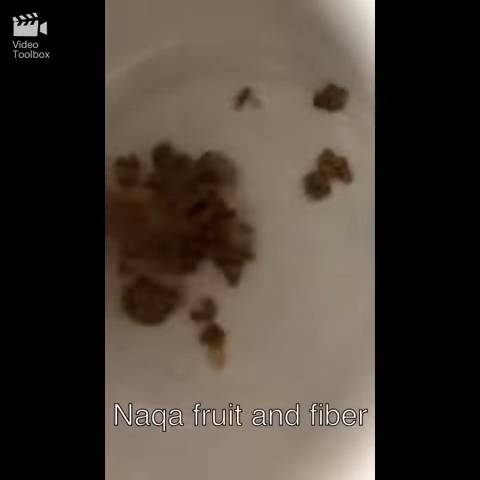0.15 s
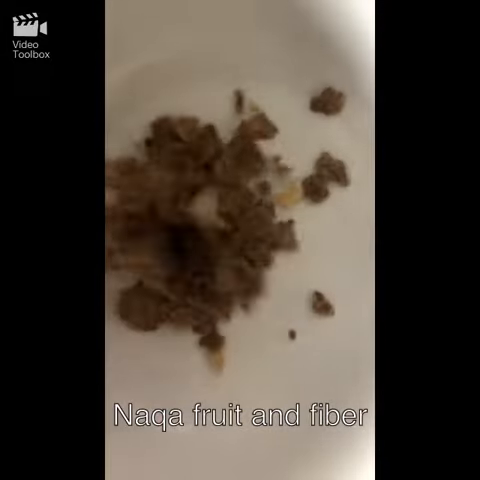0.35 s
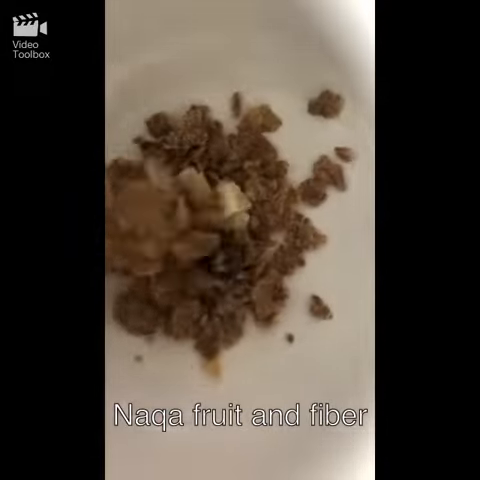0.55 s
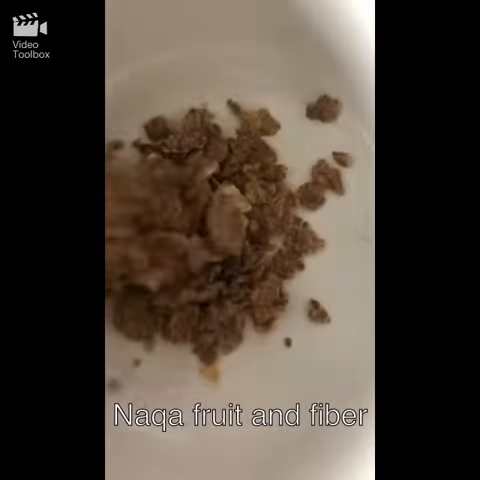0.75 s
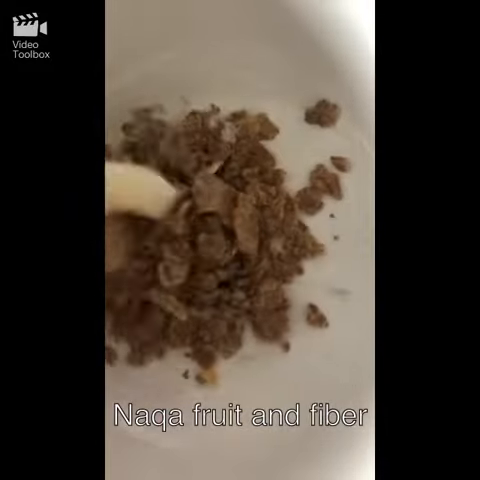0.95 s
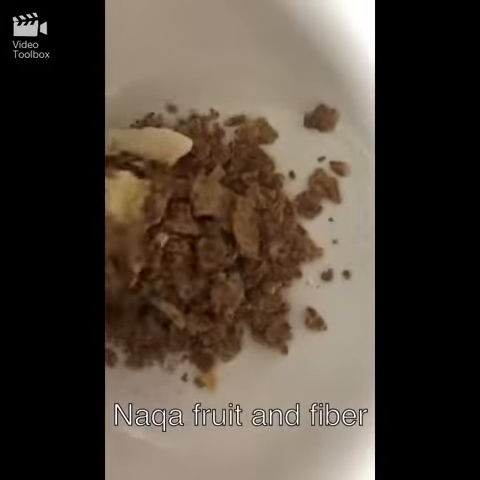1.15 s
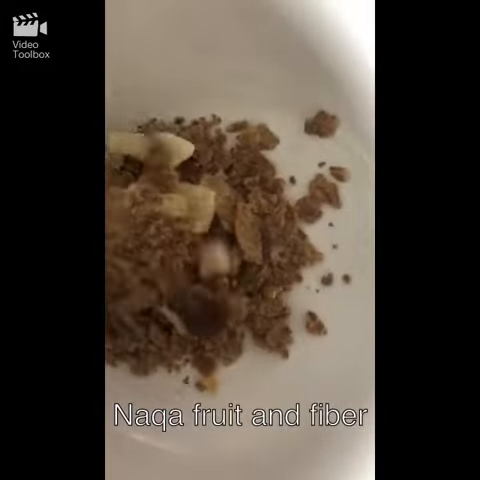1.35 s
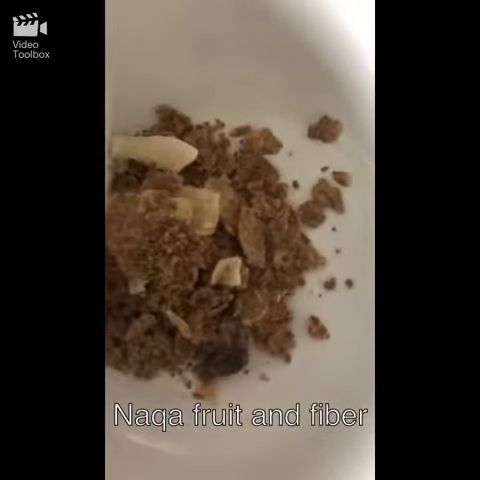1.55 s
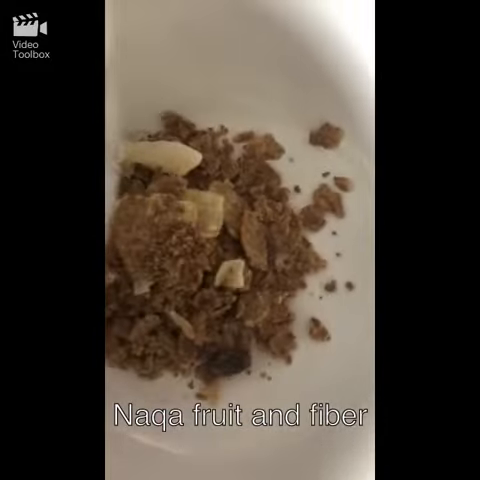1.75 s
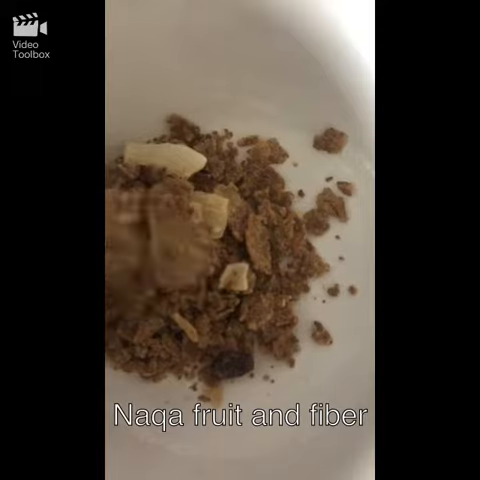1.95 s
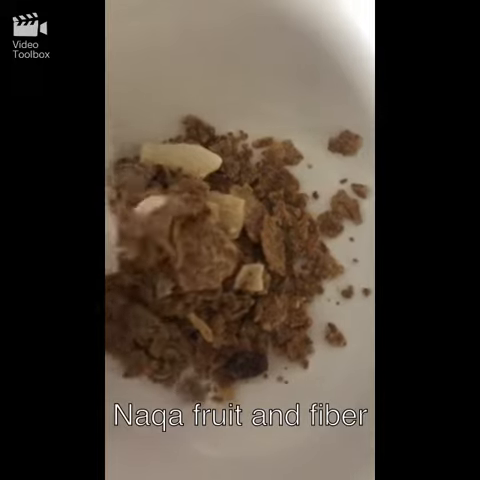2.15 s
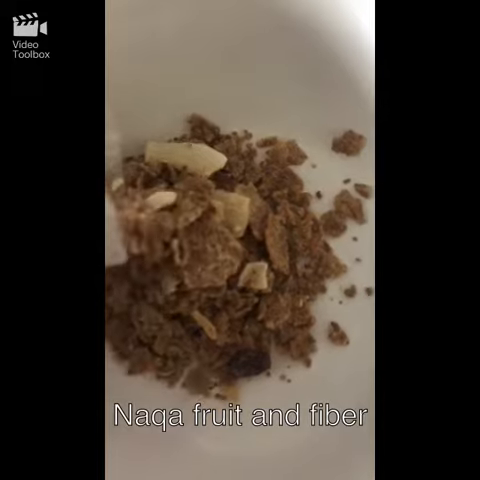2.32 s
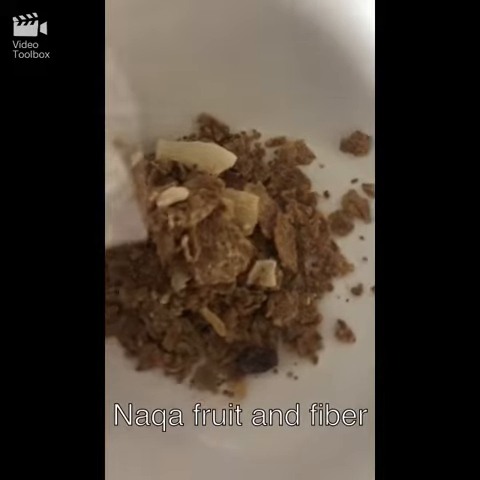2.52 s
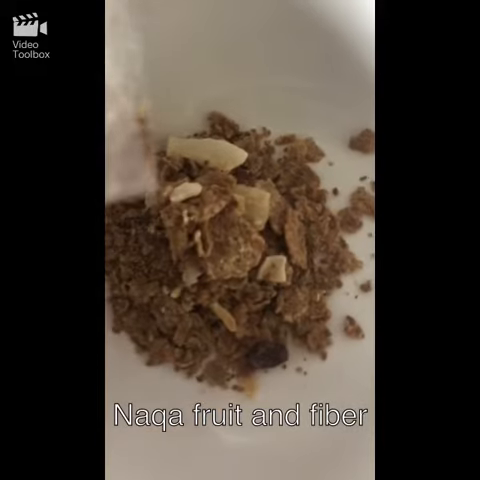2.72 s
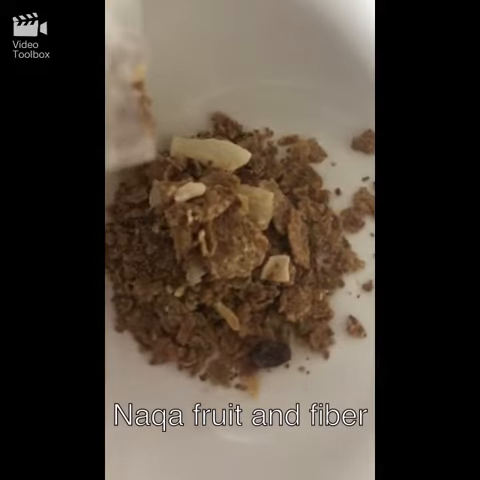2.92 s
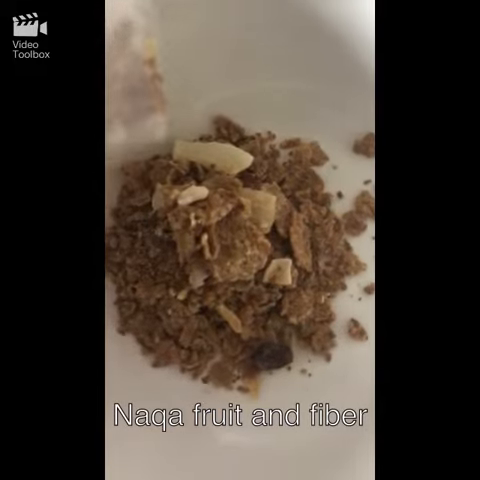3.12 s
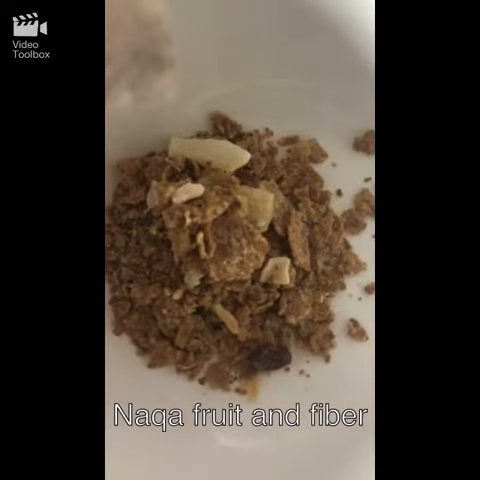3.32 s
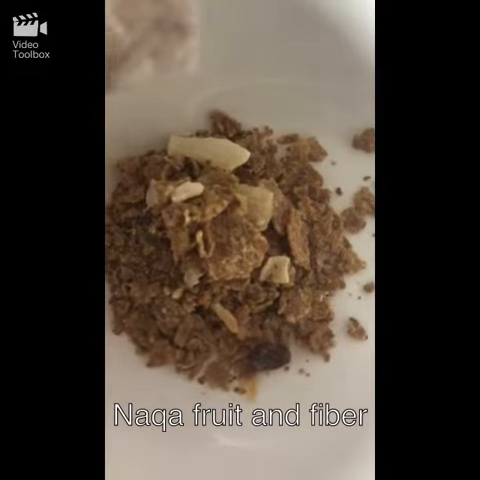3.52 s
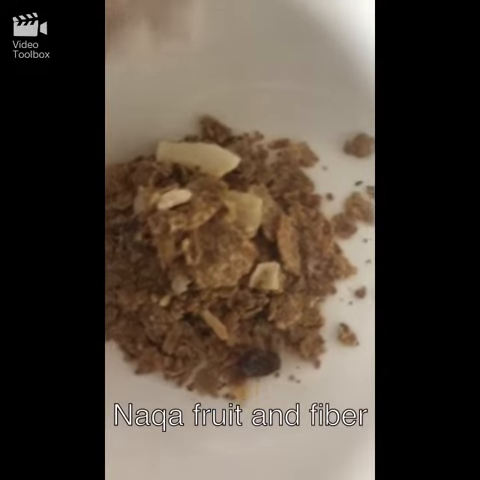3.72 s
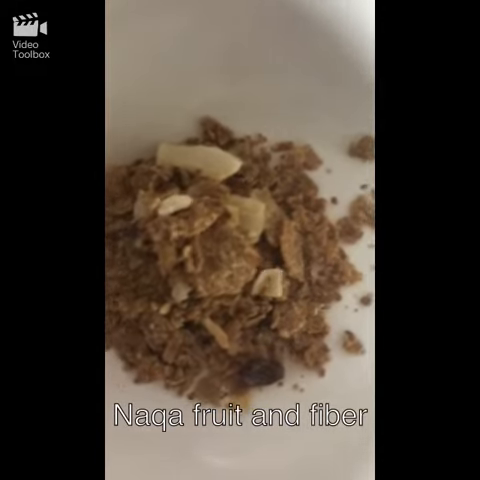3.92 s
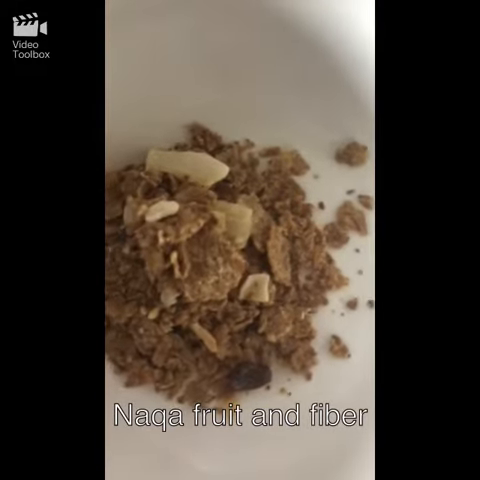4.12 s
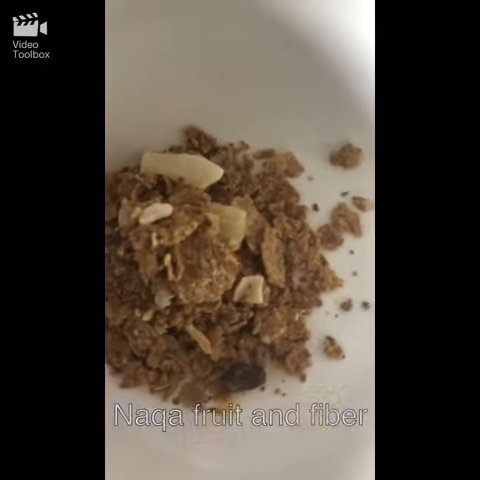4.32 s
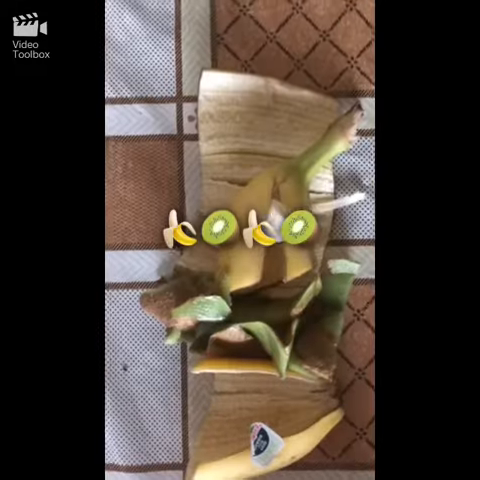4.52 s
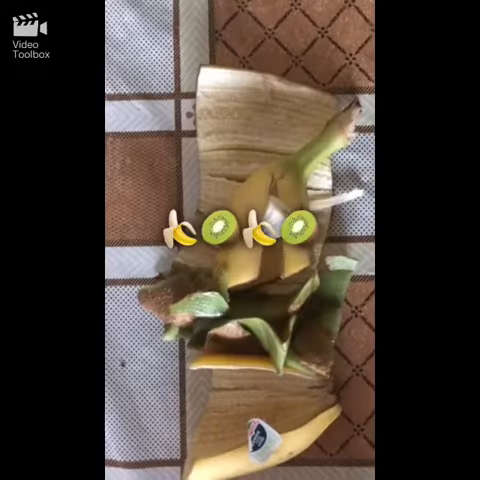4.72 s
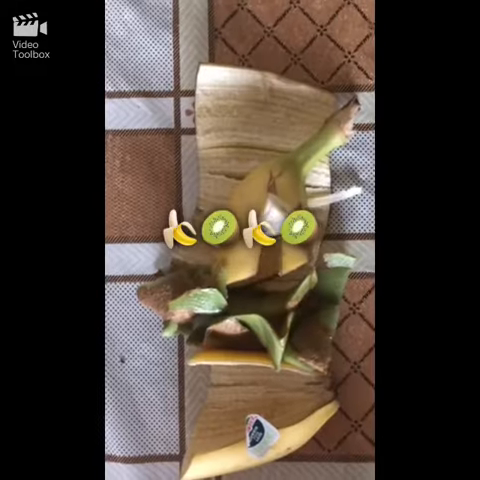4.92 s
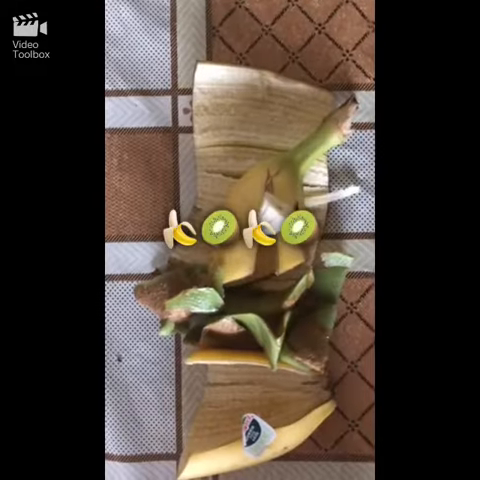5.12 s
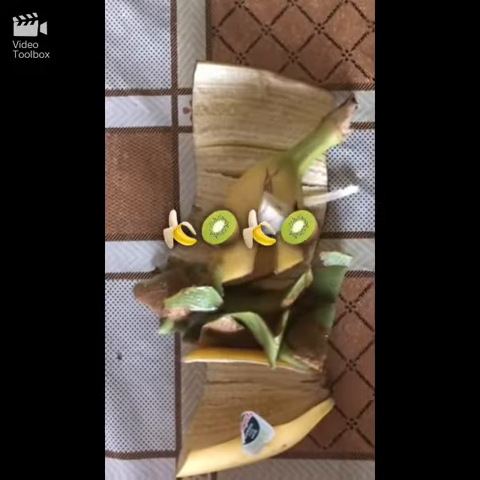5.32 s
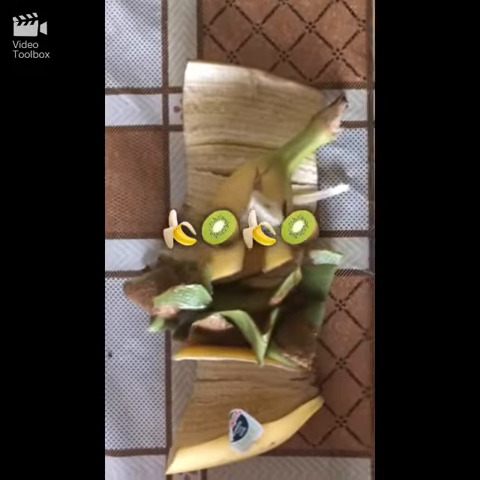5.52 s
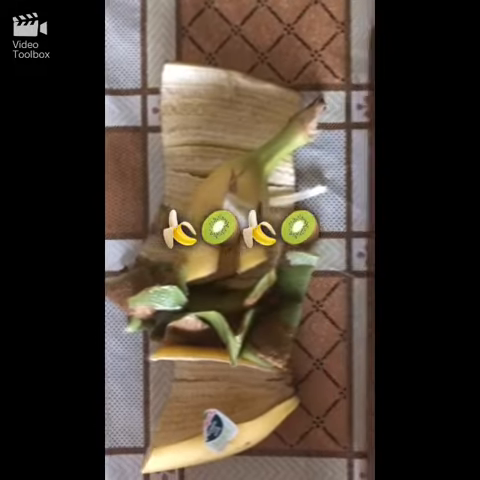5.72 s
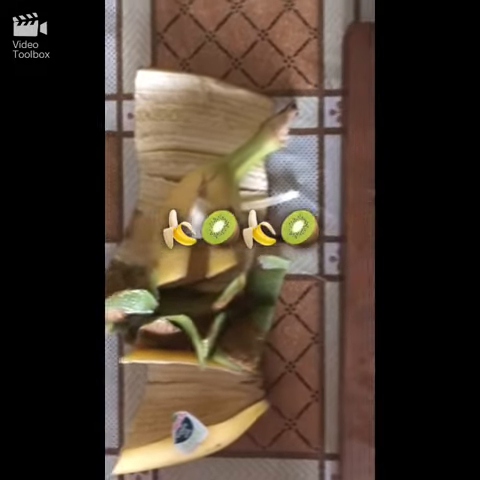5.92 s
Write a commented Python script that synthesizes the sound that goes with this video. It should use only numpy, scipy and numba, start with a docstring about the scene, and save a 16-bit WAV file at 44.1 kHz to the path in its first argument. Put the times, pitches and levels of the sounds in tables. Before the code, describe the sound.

The pour is already under way at 0 s: dry cereal flakes slide from a carton in a dense, crisp rush and rattle into a ceramic bowl, very close to a phone. Bright ticks on the glaze crowd the first half second, strongest around 0.2 s, with a slight ring from the bare bowl. As the heap grows, the patter becomes duller and steadily thinner, nearly stopping by 1.8 s. A last shake at about 2.0 to 2.2 s drops a few flakes with sharp snaps. From 2.4 to 2.8 s the bag cracks and the carton thumps dully; then fainter crackles, knocks and low handling rumbles come sparsely until about 4.5 s. After that only quiet room air and a low mains hum remain, with two faint, dull clock ticks at about 4.6 and 5.6 s. The small kitchen adds a short, soft tail.

```python
"""Dry cereal flakes slide out of a carton and rattle into a ceramic bowl, close to a phone; the stream thins,
a last shake follows, then the bag crackles and the carton thumps as it is drawn away; a clock ticks twice.
Flakes, cracks and knocks are swarms of short decaying sines; bowl, carton and bag add resonances.
Filtered noise makes the carton rumble, the clock ticks and the room air, which hums throughout."""
import sys
import numpy as np
from scipy import signal
from scipy.fft import rfft, irfft
from scipy.io import wavfile
from scipy.ndimage import uniform_filter1d
from numba import njit

SR = 44100
rng = np.random.default_rng(int(sys.argv[2]) if len(sys.argv) > 2 else 0)


def dump(signal):
    """Clip the signal to [-1, 1] and save it as 16-bit WAV at the path in sys.argv[1]."""
    limited = np.clip(np.atleast_2d(signal).T, -1, 1)
    pcm = np.round(limited * 32767).astype(np.int16)
    wavfile.write(sys.argv[1], SR, pcm)


N = 267554  # samples

# flake stream: (time [s], rush of sliding flakes [dB], patter of small flakes [dB])
STREAM = [(0, -30, -26), (0.1, -32, -27.5), (0.25, -29.5, -21.5), (0.45, -32, -26), (0.9, -35, -28),
          (1.08, -37, -32), (1.25, -39.5, -33.5), (1.45, -42.5, -38), (1.65, -49.5, -50), (1.8, -52, -55.5),
          (1.97, -49, -41.5), (2.101, -53, -42), (2.172, -46, -41), (2.3, -64.5, -60.5), (2.45, -69, -62),
          (2.8, -85, -90)]
# single flakes on glaze or heap: (time [s], relative level [dB], pitch [Hz])
FLAKE_TICKS = [(0.0285, -6, 8000), (0.0525, 1.5, 8260), (0.087, 6, 8700), (0.0967, -7, 8600),
               (0.1215, -3, 7900), (0.1336, -0.5, 8230), (0.1534, -3, 7400), (0.16, 3.5, 7900),
               (0.1724, -1, 8200), (0.1752, -1, 8600), (0.2002, -1, 7400), (0.2205, 0, 7940),
               (0.2203, 5, 14000), (0.232, 4, 12140), (0.2394, 4, 11600), (0.2424, 1.5, 8080),
               (0.2485, -9, 8040), (0.2764, -0.5, 8320), (0.2903, -4, 6960), (0.3362, -6, 8100),
               (0.4628, -7, 7400), (0.4695, -0.5, 7500), (0.5248, -5, 12800), (0.5671, -21, 14600),
               (0.6855, -11, 11000), (0.7134, -4, 7180), (0.8561, -6, 10800), (0.9484, -8, 12200),
               (0.9953, -19, 9530), (1.1283, -7, 9300), (1.2297, -14, 9000), (1.2981, -13, 14600),
               (1.3087, -7, 9070), (1.3293, 1.5, 11060), (1.5749, -21.5, 10700), (1.9215, -22, 9700),
               (1.927, -13.5, 9970), (1.966, -18, 14000), (1.9788, -7.5, 7550), (1.9842, -21, 7200),
               (2.0192, -11.5, 14100), (2.0334, -17, 8430), (2.0444, -11, 10880), (2.0729, -13.5, 8100),
               (2.085, -24, 6800), (2.1131, -13, 8540), (2.1205, -25, 12100), (2.244, -17, 12700),
               (2.2544, -20, 7240), (2.2775, -20.5, 10100), (2.318, -18.5, 8800), (2.353, -23, 8600)]
STRAY_DB, STRAY_SPREAD_DB = 10, 1.5  # chance ticks over the patter
# hollow of the bowl, gain on the flakes: (frequency [Hz], gain [dB])
HOLLOW_GAIN = [(180, -20.5), (300, -15.5), (520, -8.5), (930, -0.5), (2150, 2), (3500, 3.5), (4400, 2),
               (4900, -2.5), (7100, -0.5), (8050, -2.5), (9600, -1.5), (10100, -4.5), (10700, -2)]
# echo off the bare bowl floor, subtracted: (frequency [Hz], width [Hz], level [dB])
FLOOR_ECHO = (4950, 1800, -5.5)
HEAP_S = 1.36  # the growing heap fades that echo to 1/e
# glaze modes: (frequency [Hz], relative level [dB], t60 [s])
GLAZE_MODES = [(7900, -3, 0.049), (8790, -2.5, .04), (10650, -2.5, 0.12), (12630, -1.5, 0.079),
               (15440, 4, .06)]
BOWL_FULL_S = 0.75  # the heap damps the bowl
# carton resonances: (frequency [Hz], width [Hz], level [dB])
CARTON_MODES = [(66.1, 39, -9), (150, 60, 5), (252, 160, 4)]
# carton wall flexes: (time [s], relative level [dB], nominal pitch [Hz])
WALL_FLEXES = [(1.429, -31.5, 720), (1.871, -39, 283), (1.902, -37.5, 141), (2.002, -44, 276),
               (2.055, -41, 337), (2.563, -30.5, 156), (2.578, -27.5, 600), (2.593, -25.5, 151),
               (2.619, -37, 155), (2.7927, -21.5, 497), (2.864, -46.5, 503), (2.943, -33.5, 264),
               (3.13, -43, 210.5), (3.366, -34, 470), (3.385, -33.5, 147), (3.445, -40, 188),
               (3.727, -35, 203), (3.785, -29.5, 788), (3.994, -40, 240.4)]
# modes of a flexing wall: (multiple of its pitch, relative level [dB])
WALL_MODES = [(0.301, -7.5), (.5, -5.5), (1.002, 3), (1.5, -14.5), (2.2, -11)]
WALL_LAG_MAX_CYCLES = 0.75
RUMBLE_DB = -9.5  # rumble re rush
# room air spectrum: (frequency [Hz], relative density [dB])
AIR_SPECTRUM = [(18, -34.5), (30, -9.5), (58, -6.5), (75, -17.5), (103, -9.5), (149, -6), (259, -9),
                (295, -5.5), (328, -11.5), (889, -17.5), (1100, -19.5), (1390, -19.5), (1540, -23),
                (16000, -47)]
AIR_DB = -66  # mean level
# mains hum: (frequency [Hz], mean peak level once the bag sounds end [dB])
MAINS_HUM = [(50, -67.5), (151, -75), (199, -74.5), (285, -84.5), (1370, -82)]
HUM_RISE_DB = 5  # the hum is louder after the bag sounds end
# heavier pieces drop and the bag snaps:
# (time [s], relative crack level [dB], relative knock level [dB], knock pitch [Hz])
SNAP_EVENTS = [(0.4282, -30, -23.5, 2130), (0.738, -28, -25, 2120), (1.1284, -20, -32, 4500),
               (1.653, -24, -42, 2680), (1.9594, -17, -35, 2630), (2.1391, -38, -37, 1870),
               (2.1439, -3, -24, 2410), (2.1563, -9.5, -38, 3600), (2.1615, -7, -28, 2060),
               (2.1707, -13, -28.5, 1970), (2.373, -29, -30.5, 2370), (2.4221, -20, -35.5, 2130),
               (2.435, -37, -56, 4000), (2.4727, -33, -48, 1710), (2.4823, -20, -29.5, 1656),
               (2.5239, -28, -40, 1740), (2.562, -10.5, -29, 1870), (2.576, -32, -31.5, 2010),
               (2.589, -7, -23.5, 3700), (2.6024, -41, -37, 2470), (2.6755, -33, -44.5, 1600),
               (2.7912, -19.5, -33, 2790), (2.9018, -43, -59, 3620), (2.917, -64, -49, 1580),
               (3.0147, -47, -55.5, 1760), (3.027, -47, -63, 4500), (3.2813, -52, -42.5, 4390),
               (3.363, -23, -41, 3910), (3.467, -54, -51, 1646), (3.553, -39.5, -56, 1740),
               (3.7577, -51, -47, 1400), (3.772, -45, -52.5, 3220), (3.7861, -27.5, -35.5, 1780),
               (3.9267, -37, -56.5, 1470), (3.9605, -44, -50, 1680), (3.9858, -34.5, -46, 1745),
               (4.004, -40, -51, 2780), (4.0148, -53, -49, 2480), (4.043, -52, -47.5, 2960),
               (4.117, -56, -60, 4510), (4.135, -41, -61, 4000), (4.151, -39, -57, 4500),
               (4.2185, -38, -58, 4040), (4.2253, -55, -52, 2350), (4.2382, -31, -43.5, 1490),
               (4.286, -37, -51, 3000), (4.3, -48, -50.5, 1950), (4.357, -59.5, -60, 4530),
               (4.4556, -41, -57, 2500)]
# modes of a falling piece: (multiple of the knock pitch, level re knock [dB])
PIECE_MODES = [(.45, 3.66), (.8, 12.05), (1.25, 16.94), (2.1, 12.8)]
KNOCK_LAG_S, KNOCK_T60_CYCLES = 0.0009, 5.64  # the knock starts 0.9 ms after the listed time
# hand shifts on the pack: (time [s], held [s], relative bag rustle [dB], relative carton rumble [dB])
HAND_GRIPS = [(2.21, 0.0075, -77, -64), (2.5, 0.027, -66, -55.5), (2.607, 0.0045, -60, -48),
              (2.72, .01, -69, -63), (2.858, 0.008, -76, -66), (2.94, 0.0079, -82, -55.5),
              (3.14, .01, -78, -64), (3.369, 0.0096, -61.5, -52.5), (3.45, 0.078, -84, -65.5),
              (3.731, 0.024, -80.5, -54.5), (3.78, 0.024, -69, -61.5), (3.9, 0.025, -66.5, -64),
              (3.988, 0.017, -67.5, -57), (4.13, 0.029, -75, -82), (4.231, 0.1, -64, -71)]
GRIP_RISE_DB_PER_S, GRIP_FALL_DB_PER_S = 597.5, 184
BAG_DB, BAG_GONE_S = -77, 4.46  # rustle between grips, and its end
BAG_RUSH_DB, BAG_TREBLE_DB = -1, 1  # rush and patter in the crinkle
# ringing of bag and carton: (frequency [Hz], width [Hz], level [dB])
PACK_MODES = [(840, 140, -2.5), (1700, 230, -4), (4200, 300, -3), (5352, 320, -7)]
SWAY_HZ, SWAY_WIDTH_HZ, SWAY_LAG_S, SWAY_DB = 77, 50, 0.077, -7.5
# clock ticks: (time [s], relative level [dB])
CLOCK_TICKS = [(4.615, -50.5), (5.6136, -49.5)]
# clock case resonances: (frequency [Hz], width [Hz], level [dB])
CASE_MODES = [(1190, 1500, 6.5), (3126, 900, -5), (4080, 710, -1), (5060, 650, -2.5), (5530, 200, 0)]
CLOCK_T60_S, CLOCK_TOP_HZ = 0.51, 5700
ROOM_T60_S, ROOM_DB, ROOM_HZ = 0.2, -21.5, 5000
BASS_HZ, TOP_HZ, HISS_DB = 50.8, 15720, -86.5


def amp(db):
    """Decibels to amplitude."""
    return 10 ** (np.asarray(db) / 20)


def unit(x):
    """Scale to unit rms."""
    return x / np.sqrt(np.mean(x ** 2))


def colour(x, points):
    """Causal minimum-phase filter through (Hz, dB) points, from the cepstrum of the log gain."""
    hz, db = np.transpose(points)
    grid_hz = np.arange(4097) * SR / 8192
    log_gain = np.interp(np.log(grid_hz + 1), np.log(hz), db) * np.log(10) / 20
    cepstrum = irfft(log_gain)
    cepstrum[1:4096] *= 2  # fold onto positive time
    cepstrum[4097:] = 0
    impulse = irfft(np.exp(rfft(cepstrum)))
    return signal.fftconvolve(x, impulse)[:len(x)]


def resonate(x, peaks):
    """Sum of (Hz, width Hz, dB) resonances."""
    return sum(amp(db) * signal.lfilter(*signal.iirpeak(hz, hz / width, fs=SR), x)
               for hz, width, db in peaks)


@njit
def rings(length, start, hz, t60, size):
    """Every grain is a sine that swells for about a cycle and dies away."""
    out = np.zeros(length)
    for k in range(len(start)):
        step = np.exp(2j * np.pi * hz[k] / SR - np.log(1000) / (t60[k] * SR))
        z, unrisen = size[k] + 0j, 1.
        for i in range(max(start[k], 0), min(start[k] + int(t60[k] * SR) + 1, length)):
            z *= step
            unrisen *= np.exp(-2 * hz[k] / SR)
            out[i] += z.imag * (1 - unrisen)
    return out


def grains(start_s, hz, t60_s, size):
    """Ring one grain per array element, pitch kept within the band."""
    hz = np.clip(hz, 30, SR * .45)
    start = (start_s * SR).astype(np.int64)
    return rings(N, start.ravel(), hz.ravel(), np.abs(t60_s).ravel(), size.ravel())


def walk(rate_hz):
    """Random levels held 1 / rate_hz s and slewed twice."""
    k = int(SR / rate_hz)
    steps = np.repeat(rng.standard_normal(N // k + 1), k)
    return uniform_filter1d(uniform_filter1d(steps, k), k)[:N]


def burst(s, db, hz, smear_s, wide, t60_s, count, lag_cycles, crest=0.38):
    """A brittle piece breaks its fall in a quick cluster of contacts that swell and fade; low ones come late."""
    u = rng.random((len(s), 3, count))
    place = u[:, 0]  # position within the smear; the strongest contacts lie at crest
    away = 2 * (np.arange(count) + u[:, 1]) / count - 1  # even log-pitch spread, -1 to 1
    pitch = hz[:, None] * np.exp(wide * away)
    share = amp(-10 * np.abs(place - crest) - 6.2 * away ** 2)
    share = share / np.sqrt(np.mean(share ** 2, axis=1, keepdims=True))
    start_s = s[:, None] + smear_s * place + lag_cycles / pitch
    return grains(start_s, pitch, t60_s * (0.85 + 0.71 * u[:, 2]), amp(db[:, None]) * share)


def shower(lo_hz, hi_hz, cycles, spread_db, count):
    """Flakes touch at random; each contact sounds three short pitches at once; a few are much louder."""
    u = rng.random((count, 5))
    start_s = u[:, :1] * N / SR
    hz = lo_hz + (hi_hz - lo_hz) * u[:, 2:]
    # limit on how loud a chance contact can be
    excess = np.minimum(-np.log(1 - u[:, 1:2]), 6)
    size = amp(spread_db * excess) * np.sqrt(hz)
    return unit(grains(start_s + 0 * hz, hz, cycles / hz, size))


def flake_stream():
    """Dense contacts, low for the sliding rush and high for the patter, each wavering in level."""
    rush = shower(349, 5710, cycles=11, spread_db=1.5, count=30000) * amp(1.2 * walk(30))
    patter = shower(5500, 16350, cycles=11, spread_db=1.5, count=34000) * amp(2.4 * walk(60))
    return rush, patter


def strays(count):
    """Ticks at chance moments of the pour, their level following the patter."""
    s, _, patter_db = np.transpose(STREAM)
    u = rng.random((count, 3))
    when_s = u[:, 0] * s[-1]
    extra_db = STRAY_DB - STRAY_SPREAD_DB * np.log(1 - .95 * u[:, 1])
    db = np.interp(when_s, s, patter_db) + extra_db
    return np.transpose([when_s, db, 7000 * 2 ** u[:, 2]])


def ticks():
    """Each flake sounds near its own pitch, over a thinner spray across the treble."""
    s, db, hz = np.vstack([FLAKE_TICKS, strays(count=200)]).T
    own = burst(s, db - 11, hz, smear_s=0.0009, wide=0.17, t60_s=0.0031, count=6, lag_cycles=4)
    spray = burst(s, db - 11.5, 10500 + 0 * hz, smear_s=0.00094, wide=0.39, t60_s=0.001,
                  count=10, lag_cycles=5)
    return own + spray


def bowl(blows):
    """Glaze modes ring while the bowl is still bare."""
    t = np.arange(int(.12 * SR)) / SR
    ring = sum(amp(db - 60 * t / t60_s) * np.sin(2 * np.pi * hz * t) for hz, db, t60_s in GLAZE_MODES)
    bareness = np.exp(-(np.arange(N) / SR / BOWL_FULL_S) ** 2)
    return amp(-41.5) * signal.fftconvolve(blows * bareness, ring)[:N]


def carton(shaking):
    """Sliding weight shakes the cardboard; when a wall flexes, all its modes ring and the low ones linger."""
    rumble = unit(resonate(rng.standard_normal(N) * amp(2 * walk(40)), CARTON_MODES))
    s, db, hz = np.transpose(WALL_FLEXES)[:, :, None]
    multiple, mode_db = np.transpose(WALL_MODES)
    u = rng.random((len(s), 2, len(WALL_MODES)))
    pitch = hz * multiple * (1 + 0.084 * (u[:, 0] - .5))
    start_s = s + WALL_LAG_MAX_CYCLES / pitch * u[:, 1]
    thumps = grains(start_s, pitch, .013 + 8.5 / pitch, amp(db - 4 + mode_db))
    return shaking * rumble + thumps


def kitchen():
    """Steady noise of room air and wavering mains hum."""
    t = np.arange(N) / SR
    sound = unit(colour(rng.standard_normal(N), AIR_SPECTRUM)) * amp(AIR_DB + 1.3 * walk(2.7))
    for hz, db in MAINS_HUM:
        level = amp(db - HUM_RISE_DB * (t < BAG_GONE_S) + 3 * walk(39))
        sound = sound + level * np.sin(2 * np.pi * hz * t + 1.14 * walk(7.9))
    return sound


def snaps():
    """Wide bright crack and one firm, duller knock, then crumbs that trickle after."""
    s, crack_db, knock_db, knock_hz = np.transpose(SNAP_EVENTS)
    crack = burst(s, crack_db - 9, 9500 + 0 * s, smear_s=0.0014, wide=0.7, t60_s=0.0011,
                  count=14, lag_cycles=3)
    multiple, mode_db = np.transpose(PIECE_MODES)
    pitch = knock_hz[:, None] * multiple
    start_s = s[:, None] + KNOCK_LAG_S + 0 * pitch
    knock = grains(start_s, pitch, KNOCK_T60_CYCLES / pitch, amp(knock_db[:, None] + mode_db))
    crumbs = burst(s, knock_db - 10, knock_hz, smear_s=0.0057, wide=1.278, t60_s=0.007,
                   count=40, lag_cycles=1.4, crest=.05)
    return crack + knock + crumbs


def grips(t):
    """Each grip swells fast, holds and lets go; amplitudes of the rustle and of the rumble."""
    s, held_s, *levels = np.transpose(HAND_GRIPS)[:, :, None]
    rise_db = -GRIP_RISE_DB_PER_S * np.maximum(s - t, 0)
    fall_db = -GRIP_FALL_DB_PER_S * np.maximum(t - s - np.abs(held_s), 0)
    return [amp(db + rise_db + fall_db).sum(axis=0) for db in levels]


def bag(t, rustle, rush, patter):
    """The bag crinkles in uneven contacts mixed with the flakes' own, fluttering in level."""
    crinkle = shower(1300, 5850, cycles=16, spread_db=5, count=4000)
    crinkle = crinkle + amp(BAG_RUSH_DB) * rush + amp(BAG_TREBLE_DB) * patter
    level = rustle + amp(BAG_DB) * (t < BAG_GONE_S)
    return level * unit(crinkle) * amp(3.4 * walk(120))


def sway(t):
    """The whole pack sways after a grip: low resonant noise under the delayed grip shape."""
    noise = unit(resonate(rng.standard_normal(N), [(SWAY_HZ, SWAY_WIDTH_HZ, 0)]))
    return amp(SWAY_DB) * noise * grips(t - SWAY_LAG_S)[1]


def clock():
    """A far tick, heard mostly through the walls: dull noise with a soft rise and a long tail."""
    t, shape = np.arange(N) / SR, 0
    for s, db in CLOCK_TICKS:
        age = np.maximum(t - s + 0.02, 0)  # the rise begins 20 ms early
        shape = shape + amp(db - 11 - 60 * age / CLOCK_T60_S) * (1 - np.exp(-(age / 0.014) ** 2))
    low_pass = signal.cheby1(8, 1, CLOCK_TOP_HZ, fs=SR, output="sos")
    dull = signal.sosfilt(low_pass, rng.standard_normal(N))
    return shape * unit(resonate(dull, CASE_MODES) + amp(-14) * rng.standard_normal(N))


def room(x):
    """Diffuse tail of the kitchen, duller than the direct sound."""
    t = np.arange(int(.5 * SR)) / SR
    tail = rng.standard_normal(len(t)) * amp(-60 * t / ROOM_T60_S) * (1 - np.exp(-t / 0.0013))
    tail = signal.lfilter(*signal.butter(1, ROOM_HZ, fs=SR), tail)
    return amp(ROOM_DB) * signal.fftconvolve(x, tail / np.sqrt(np.sum(tail ** 2)))[:N]


def scene():
    """Flakes in the bowl and the handled pack, with their room tail, over clock and kitchen."""
    t = np.arange(N) / SR
    s, *columns = np.transpose(STREAM)
    sliding, small = (amp(np.interp(t, s, db, right=-120)) for db in columns)
    rustle, grip_rumble = grips(t)
    rush, patter = flake_stream()

    bright = small * patter + ticks()
    flakes = colour(sliding * rush + bright, HOLLOW_GAIN)
    floor_echo = np.exp(-t / HEAP_S) * resonate(flakes, [FLOOR_ECHO])

    crackle = bag(t, rustle, rush, patter) + snaps()
    shaking = amp(RUMBLE_DB) * sliding + grip_rumble
    pack = crackle + resonate(crackle, PACK_MODES) + sway(t) + carton(shaking)

    near = flakes - floor_echo + bowl(bright) + pack
    return (near + room(near) + clock() + kitchen())[None]


def record(dry):
    """The phone hisses faintly, rounds the loudest peaks, drops the deepest bass and cuts the top steeply."""
    heard = np.tanh(dry + amp(HISS_DB) * rng.standard_normal(N))
    lean = signal.sosfilt(signal.butter(3, BASS_HZ, "high", fs=SR, output="sos"), heard)
    return signal.sosfilt(signal.ellip(8, .5, 40, TOP_HZ, fs=SR, output="sos"), lean)


dry = scene()
out = record(dry)
dump(out)
```